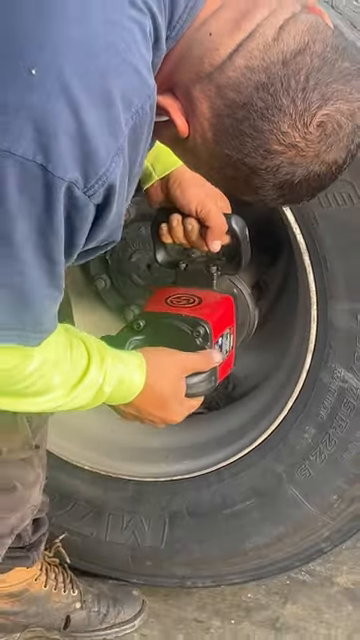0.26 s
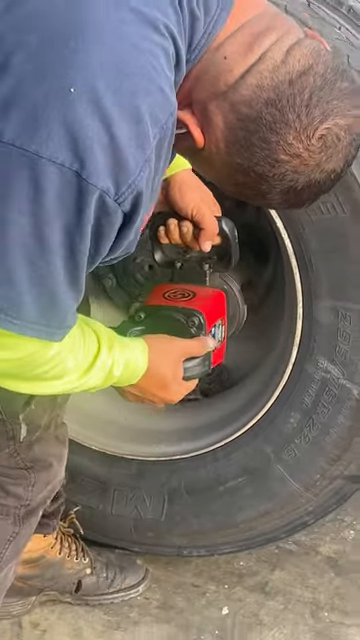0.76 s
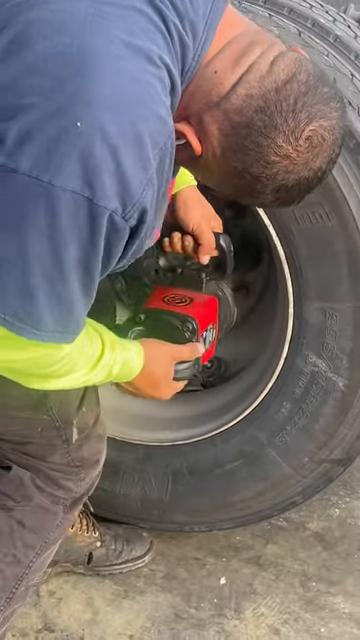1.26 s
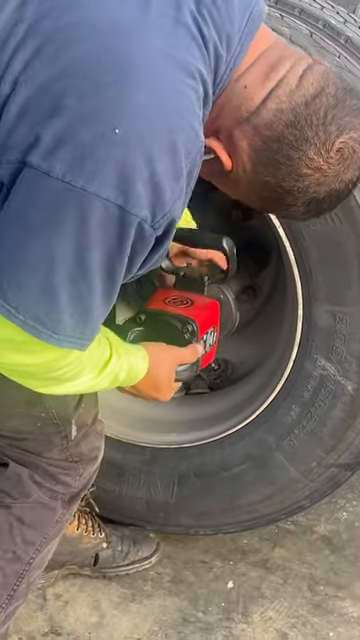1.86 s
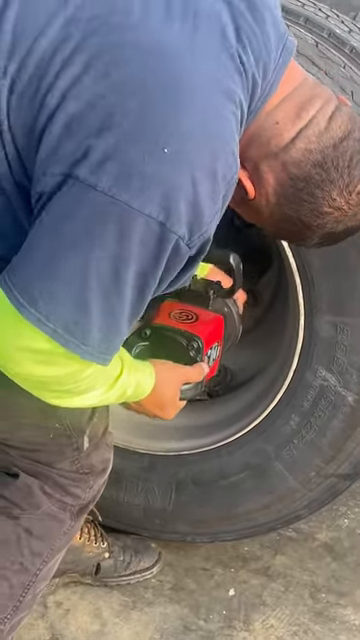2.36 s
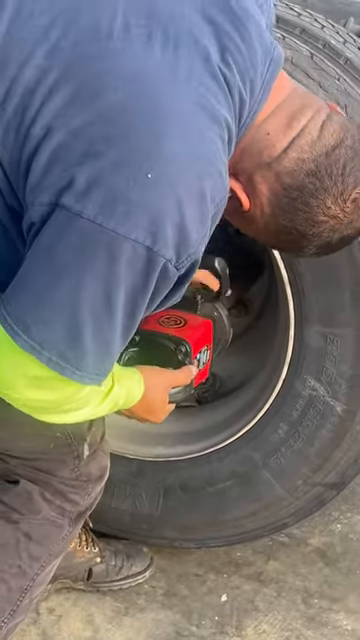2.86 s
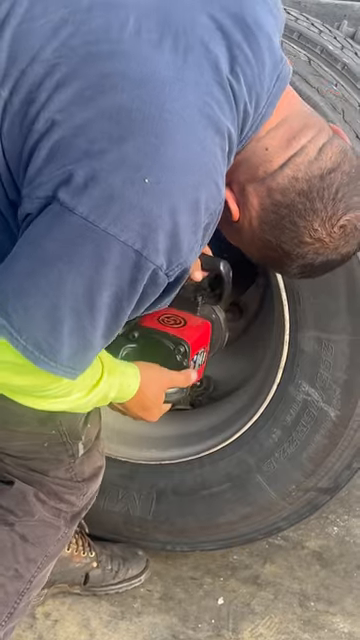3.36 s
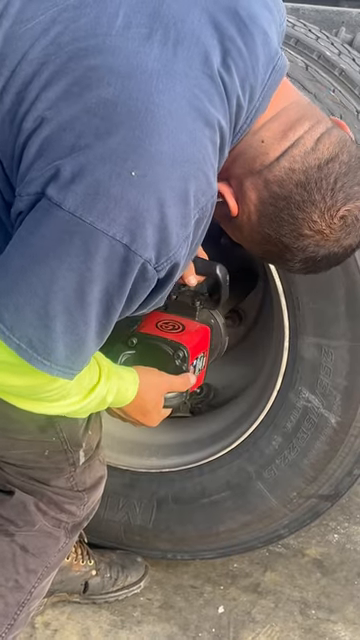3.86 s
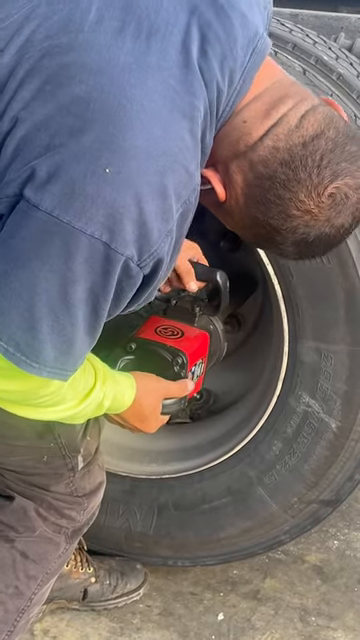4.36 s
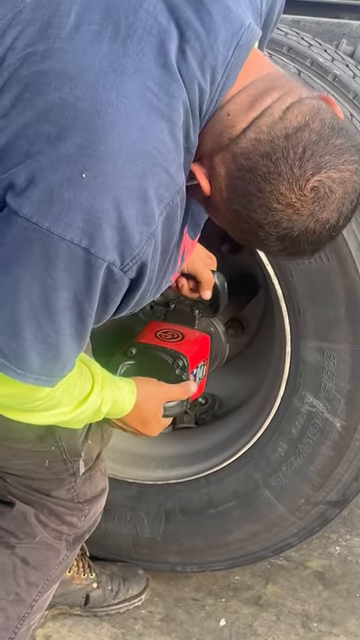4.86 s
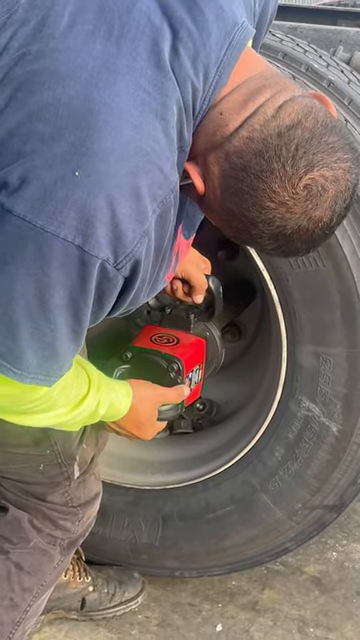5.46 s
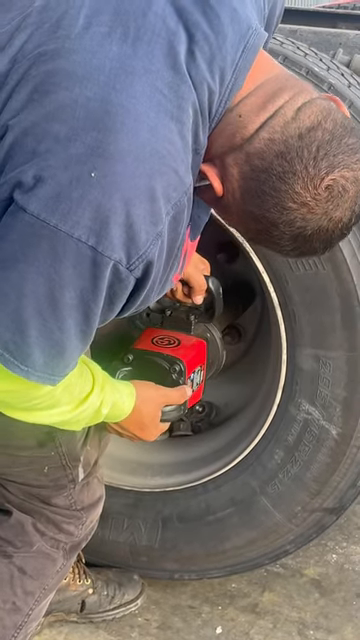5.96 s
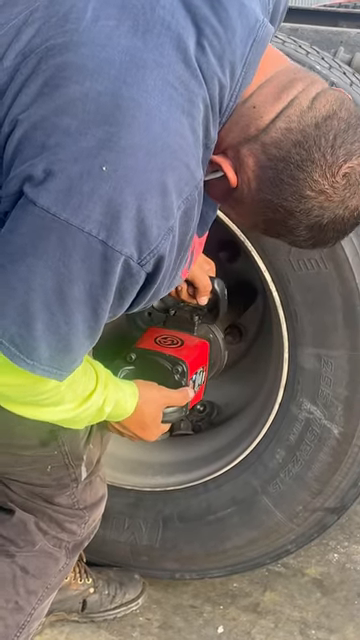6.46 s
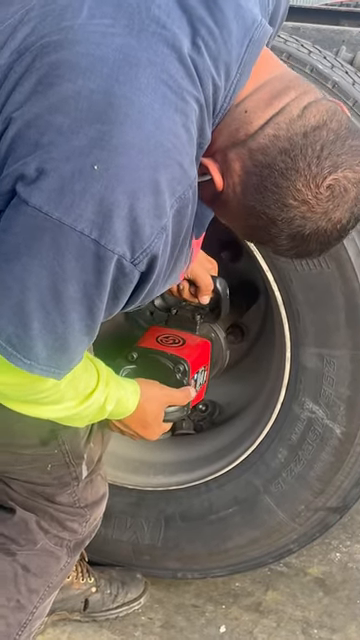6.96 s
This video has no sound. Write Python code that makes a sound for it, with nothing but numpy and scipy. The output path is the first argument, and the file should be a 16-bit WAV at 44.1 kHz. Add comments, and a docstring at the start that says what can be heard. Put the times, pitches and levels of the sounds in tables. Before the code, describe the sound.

A socket clinks onto a truck wheel nut before an air impact wrench pounds it with ringing metal blows and hissing exhaust.

```python
"""A noisy truck shop, a two-port microphone close to a pneumatic impact wrench on a wheel nut.
The socket is fitted with small clinks, then the tool hammers: each blow stalls the vane motor, the cam
slips free with a rattle, and the motor runs up again in quickening exhaust puffs until the next blow.
Farther off, machines rumble and hum and an air line hisses; the bay returns a little echo."""
import sys
import numpy as np
from scipy import signal
from scipy.fft import rfft, irfft, next_fast_len
from scipy.io import wavfile
from scipy.ndimage import map_coordinates

SR = 44100
rng = np.random.default_rng(int(sys.argv[2]) if len(sys.argv) > 2 else 0)


def transcribe(u):
    """Save the signal u as a 16-bit wav file named by the first command-line argument.

    u: samples, shape (n,) or (channels, n), limited to [-1, 1]; the rate is SR.
    q: integer samples, one column per channel.
    """
    v = np.clip(np.atleast_2d(u).T, -1, 1)
    q = np.round(v * 32767).astype(np.int16)
    wavfile.write(sys.argv[1], SR, q)


N = 317501
TIME = np.arange(N) / SR
T = np.arange(-SR // 10, SR // 10 + 1) / SR  # seconds around one short event

# The wrench close up, a row per hammer turn:
# (stalled rotor jerks free [s], rattle level [dB], blow on the anvil [s], blow level [dB])
HAMMER_TURNS = [(3.083, -28, 3.1158, -2.5), (3.1834, -15, 3.23, -2), (3.3173, -4.5, 3.3848, -2.5),
                (3.4748, -4, 3.5389, -2.5), (3.6167, -26, 3.6781, -2), (3.765, -3.5, 3.8286, -1),
                (3.9172, -4.5, 3.9807, -0.5), (4.0675, -4.5, 4.131, -2), (4.219, -4, 4.2812, -3),
                (4.371, -4, 4.4335, -2), (4.5217, -3.5, 4.586, -2.5), (4.6747, -4.5, 4.7394, -1),
                (4.826, -4, 4.8913, -3), (4.9793, -7.5, 5.0448, -3), (5.132, -6, 5.1964, -3),
                (5.284, -5, 5.3482, -5), (5.4363, -6.5, 5.5, -4), (5.5888, -6, 5.6549, -4),
                (5.7412, -6, 5.8042, -4.5), (5.8938, -5.5, 5.9544, -4.5), (6.0446, -8, 6.11, -5),
                (6.1989, -11.5, 6.2645, -5.5), (6.3533, -9.5, 6.4179, -4), (6.5079, -9, 6.576, -4),
                (6.6615, -8.5, 6.7287, -5), (6.8159, -10.5, 6.8862, -4), (6.9711, -8.5, 7.0414, -5),
                (7.1268, -11.5, 7.1964, -11)]
# Rattles out of step, as the tool starts and where the cam catches late: (time [s], level [dB])
ODD_RATTLES = [(3.034, -20), (3.0894, -25), (3.6228, -3)]
RATTLE_LEAD_S = 0.0077  # the cam rattles ahead of the jerk's pop


def hammer():
    """A blow lands hard on the anvil and chatters briefly; the cam rattle builds more slowly."""
    chatter = swell(0.0011, 0.0069) + 0.47 * np.roll(swell(0.0097, 0.0051), round(0.0063 * SR))
    blows = strikes([turn[2:] for turn in HAMMER_TURNS], chatter, lead_s=0,
                    taps=[(.3, 27.46), (5.43, 26.65)], chatter_db=0, crash_db=12, column=BLOW)
    slips = [(s - RATTLE_LEAD_S, db) for s, db, *_ in HAMMER_TURNS] + ODD_RATTLES
    rattles = strikes(slips, swell(0.0072, 0.0097), lead_s=0.0017,
                      taps=[(1, 22), (6, 19.5)], chatter_db=9.5, crash_db=11, column=RATTLE)
    return blows + rattles


def strikes(events, chatter, lead_s, taps, chatter_db, crash_db, column):
    """Repeatable taps (delay [ms], level [dB]) set the ring; fine random chatter roughens its treble."""
    s, db = np.transpose(events)
    grit = played(s - lead_s, db, chatter) * rng.standard_normal((2, N)) * amp(2 * wobble(500))
    impulse = 1. * (T == 0)
    knocks = sum(played(s + ms / 1000, db + tap_db + rng.normal(0, 0.98, len(s)), impulse)
                 for ms, tap_db in taps)
    force = knocks + amp(chatter_db) * filtered(grit[0], band(1150, 20000))
    return steel(force, amp(crash_db) * grit[1], column)


# Anvil, socket and wheel ringing near the microphone:
# (frequency [Hz], width [Hz], gain for a blow [dB], for a rattle [dB], for a clink [dB])
STEEL_MODES = [(604.5, 38, -1.5, -6, 3), (867, 104, -54, -6.5, -1), (1625, 44, -3, -14, 0.5),
               (1986, 15.6, 0, -5, -2), (2004, 106, 0.5, -1.5, 0), (2424, 64, -1.5, -4, -15),
               (2600, 88, -3, -11, -12), (2780, 53, 2, -4, -7), (2920, 19, 3.5, -5, -1.5),
               (3170, 47, -2.5, -12.5, -6), (3638, 55, -5, -12, -26), (4530, 60, -6, -13.5, -40),
               (4988, 193, -6.5, -16, -18), (5500, 49, -6.5, -12.5, -5.5), (5670, 83, -4.5, -13.5, -22),
               (7400, 670, -13, -17.5, -44), (9430, 65, -19, -37, -32), (11070, 80, -5.5, -19, -32)]
BLOW, RATTLE, CLINK = 2, 3, 4  # its gain columns
# Each mode's change as the nut seats: (rise [dB])
SEATING_RISE = [1.5, 4, 2, -4.5, -3.5, 2, -2, 1.5, 0.5, 0, -4.5, -3, 0.5, 3, -1.5, 0, 0, 4.5]
SEATING_S = (3.2, 6)
# Dense modes between the clear ones: (frequency [Hz], gain [dB])
CRASH_TONE = [(300, -28.5), (700, -23), (1400, -21.5), (3000, -20), (5600, -22), (8300, -30.5),
              (12000, -26), (14000, -36), (15600, -52)]


def steel(force, grit, column):
    """The force rings the modes, recoloured as the nut seats; grit feeds a broadband crash."""
    seated = np.interp(TIME, SEATING_S, [0, 1])
    db = np.transpose(STEEL_MODES)[column] + np.outer([-.5, .5], SEATING_RISE)  # loose, seated
    gains = amp(db) * (-1) ** np.arange(len(STEEL_MODES))
    modes = lambda f: gains @ np.array([peak(f, hz, width) for hz, width, *_ in STEEL_MODES])
    ring = filtered(force * [1 - seated, seated], modes).sum(axis=0)
    return ring + filtered(grit, lambda hz: amp(along(CRASH_TONE, hz)))


# Air through the motor: (time [s], leak level [dB], jerk puff level [dB], run-up puff level [dB])
MOTOR_AIR = [(3.02, -41, -14.5, -16.5), (3.09, -27.5, -14.5, -17.5), (3.19, -30.5, -20, -16),
             (3.32, -28, -11.5, -16.5), (3.63, -29, -13, -19), (3.93, -28.5, -11.5, -18),
             (4.69, -30.5, -12.5, -19.5), (5.6, -32, -16.5, -21.5), (6.35, -33.5, -16.5, -22),
             (7.2, -33.5, -14, -21.5)]
# Puffs round the jerk: (offset [ms], relative pop [dB], hiss [dB], whistle [dB])
JERK_PAIR = [(-14.5, -8.5, -5, -8.5), (0, -1, 4, 4)]
# Puffs of a run-up: (offset before stretching [ms], relative pop [dB], hiss [dB], whistle [dB])
RUNUP_STRING = [(0, 3, 7.5, 6), (12.46, -1.5, 3, 7), (21.77, -4.5, 0, 6), (29.92, -2.5, -0.5, 8),
                (37.08, -2.5, 4.5, 13.5), (43.9, -3, 0, 5), (55.2, -18, -19, -31)]
RUNUP_S, RUNUP_WAIT_S = .0368, .013  # longest lead on the blow, shortest wait after the jerk


def motor_puffs():
    """Each turn vents a pair, then a quickening string: rows of (s, dB, pop, hiss, whistle dB)."""
    jerk_s, _, blow_s, _ = np.transpose(HAMMER_TURNS)
    runup_s = np.maximum(blow_s - RUNUP_S, jerk_s + RUNUP_WAIT_S)
    stretch = 1.02 * ((blow_s - runup_s) / RUNUP_S) ** .48  # a short run-up crowds its puffs
    at, _, jerk_db, runup_db = np.transpose(MOTOR_AIR)
    jerks = [(s + ms / 1000, np.interp(s, at, jerk_db), *levels)
             for s in jerk_s for ms, *levels in JERK_PAIR]
    runups = [(s + k * ms / 1000, np.interp(s, at, runup_db), *levels)
              for s, k in zip(runup_s, stretch) for ms, *levels in RUNUP_STRING]
    return jerks + runups


# The exhaust jet at close range: (frequency [Hz], spectral level [dB])
JET_TONE = [(700, 6.5), (1300, -1.5), (2000, -3.5), (3000, -4.5), (4200, -2), (5600, -3), (8300, -8.5),
            (10000, -3), (12500, 1.5), (14300, -3), (15600, -29)]


def exhaust():
    """Each vane chamber vents: hiss and a short whistle first, then a low pop out of the muffler."""
    s, db, *levels = np.transpose(motor_puffs())
    scatter_db = [[.8], [1.2], [.8]] * rng.standard_normal((len(s), 3)).T
    pop_db, hiss_db, whistle_db = db + levels + scatter_db
    pop = np.exp(-.5 * ((T - .0008) / 0.0028) ** 2) * np.cos(2 * np.pi * 170 * T)
    pop += 0.66 * np.exp(-.5 * ((T - .008) / 0.0033) ** 2) * np.cos(2 * np.pi * 72 * (T - .012))
    whistle = np.cos(2 * np.pi * 930 * T) + 0.23 * np.cos(2 * np.pi * 500 * T)
    whistle *= np.exp(-.5 * (T / 0.0015) ** 2)
    vent_s = s - .0085
    jet = played(vent_s - .003, hiss_db - 7, swell(0.004, 0.0051))
    hiss = filtered(jet * noise(JET_TONE), band(890, 16400))
    return played(s, pop_db, pop) + played(vent_s, whistle_db - 11.5, whistle) + hiss


# The leak at close range: (frequency [Hz], spectral level [dB])
LEAK_TONE = [(400, 4), (700, -12), (1300, -5.5), (2000, -2), (3000, 1.5), (4200, -4), (5600, -3.5),
             (7000, -6), (8300, -14.5), (10000, -10.5), (12000, -10), (13800, -11.5), (15300, -30)]


def vane_leak():
    """Air hisses past the vanes for as long as the tool runs."""
    leak_db = curves(MOTOR_AIR)[0] + 2.4 * wobble(40)
    return amp(leak_db) * (TIME > 3.03) * noise(LEAK_TONE)


# Socket and tool touch nut and rim, near the microphone:
# (time [s], level [dB], relative thud [dB], contact decay [ms], low edge [Hz], high edge [Hz])
TOUCHES = [(0.222, -29.5, -7, 8, 390, 9600), (0.799, -42, -25, 4, 1300, 6500),
           (0.8592, -37.5, -18, 5.9, 1290, 7000), (0.927, -44, -17, 3, 1700, 2600),
           (1.012, -33.5, -11, 4.4, 390, 9000), (1.1937, -40.5, -13, 5.2, 500, 5500),
           (1.284, -44, -17, 2, 3000, 6500), (1.354, -46, -22, 4.6, 1500, 6000),
           (1.6375, -33.5, -18, 3.2, 1500, 2780), (2.156, -49.5, -20, 18, 1200, 5000),
           (2.4164, -49, -20, 3, 1500, 5000), (2.43, -44, -22, 4.5, 1500, 6500),
           (2.565, -47, -20, 4, 1500, 3000), (2.62, -34, -10, 17, 1550, 5540),
           (2.672, -27.5, 0, 11, 300, 11700)]


def socket_clinks():
    """Light touches ring the same steel, each over its own band; the heavier ones thud in the tyre."""
    grit = rng.standard_normal(N)
    force = sum(filtered(grit * played([s], [db + 12], swell(0.0013, ms / 1000)), band(low, high))
                for s, db, _, ms, low, high in TOUCHES)
    s, db, thud_db, *_ = np.transpose(TOUCHES)
    thud = swell(0.011, 0.012) * (np.sin(2 * np.pi * 105 * T) + 1.02 * np.sin(2 * np.pi * 190 * T))
    thud += 1.02 * swell(0.0011, 0.0057) * np.sin(2 * np.pi * 420 * T)
    return steel(force, amp(7.5) * force, CLINK) + played(s, db + thud_db, thud)


# Faint rings among the clinks: (time [s], frequency [Hz], level [dB], time to fall 60 dB [s])
THIN_RINGS = [(0, 1233, -45, .25), (0, 1231, -51, 1.4), (0, 11127, -56, .7), (.9, 2700, -62, .6),
              (1.16, 2700, -65, .5), (2.03, 2700, -62, .15)]


def thin_rings():
    """Lone thin tones flicker as they die away."""
    rings = np.zeros(N)
    for s, hz, db, t60 in THIN_RINGS:
        level_db = db - 60 * np.abs(TIME - s) / t60 + 1.6 * wobble(29)
        rings += (TIME > s) * amp(level_db) * np.sin(2 * np.pi * hz * TIME)
    return rings


# The shop floor, well back from the microphone: (time [s], rumble level [dB], hiss level [dB])
SHOP_LEVELS = [(0.0, -50, -55.5), (0.12, -49, -60.5), (0.32, -49, -58), (0.53, -47.5, -60),
               (0.87, -47, -57.5), (1.02, -44, -56), (1.18, -44, -55), (1.49, -43.5, -56),
               (2.65, -42.5, -54.5), (2.79, -40.5, -52.5), (3.0, -40, -53)]
# Its room tone: (frequency [Hz], spectral level [dB])
ROOM_TONE = [(30, 2.5), (65, 6.5), (130, -3), (240, -2), (400, -12), (800, -21), (1600, -25), (3000, -34.5),
             (5000, -40.5), (7000, -33.5), (9000, -39), (12000, -28), (14000, -33), (15500, -35)]
# Distant machines: (frequency [Hz], pitch waver [Hz], level waver [dB], relative level [dB])
MACHINE_HUM = [(66.1, 6.05, 5.5, -55), (235.8, 4, 1.8, -50.5)]


def shop():
    """Distant machines rumble and hum; an air line hisses."""
    rumble_db, hiss_db = curves(SHOP_LEVELS)
    bed = noise(ROOM_TONE)
    low = filtered(bed, lambda hz: 1 / (1 + (hz / 700) ** 4))
    hum = np.zeros(N)
    for hz, waver_hz, waver_db, db in MACHINE_HUM:
        gain = amp(db + 1 + waver_db * wobble(25))
        hum += gain * np.sin(2 * np.pi * np.cumsum(hz + waver_hz * wobble(20)) / SR)
    rumble = amp(rumble_db + 1.6 * wobble(6)) * unit(low)
    hiss = amp(hiss_db + 1.1 * wobble(1.7)) * unit(bed - low)
    return rumble + hiss + hum


# The work bay around the microphone: (frequency [Hz], time to fall 60 dB [s])
BAY_DECAY = [(200, 0.17), (2000, 0.4), (10000, 0.12)]


def bay_echo(x):
    """The bay returns a short diffuse tail, different at each port."""
    hz, t, spectrum = signal.stft(rng.standard_normal((2, SR // 2)), SR, nperseg=256)
    decay = amp(-60 * t / along(BAY_DECAY, hz)[:, None])
    tail = signal.istft(spectrum * decay, SR, nperseg=256)[1]
    sent = filtered(x, band(230, 20000))
    return signal.fftconvolve(sent[None], tail / np.linalg.norm(tail[0]), axes=1)[:, :N]


# Phase across the microphone: (frequency [Hz], left port's lead [rad])
PORT_LEAD = [(0, 0), (600, -.3), (1300, -1.2), (2500, .4), (4200, 0), (6000, -.6), (8300, -np.pi),
             (12100, -2 * np.pi), (15300, -3 * np.pi)]
# Its balance: (frequency [Hz], left minus right [dB])
PORT_TILT = [(90, 0), (150, -1), (250, -2), (700, -1), (1300, -4.5), (2400, -1), (4400, 0)]
# Sound common to both ports: (frequency [Hz], share of power [0-1])
PORT_SHARE = [(90, 1), (150, .995), (300, .86), (600, .97), (950, .94), (1400, .68), (2500, .96),
              (4200, .995), (6000, .85), (8300, .98), (10000, .8), (12100, .97), (14000, .85), (15300, .99)]


def microphone(x):
    """Both ports hear one sound with a phase lead and tilt, plus a part scattered differently to each."""
    def direct(hz):
        left = amp(along(PORT_TILT, hz) / 2) * np.exp(.5j * np.interp(hz, *np.transpose(PORT_LEAD)))
        return np.sqrt(along(PORT_SHARE, hz)) * np.array([left, 1 / left])
    unshared = filtered(x, lambda hz: np.sqrt(1 - along(PORT_SHARE, hz)))
    spectrum = signal.stft(unshared, nperseg=256)[2]
    phases = np.exp(2j * np.pi * rng.random((2, *spectrum.shape)))
    scattered = signal.istft(spectrum * phases, nperseg=256)[1][:, :N]
    return filtered(x, direct) + np.sqrt(2) * scattered


def amp(db):
    """dB to gain."""
    return 10 ** (np.asarray(db) / 20)


def unit(x):
    """Scaled to rms 1."""
    return x / np.sqrt(np.mean(x ** 2) + 1e-20)


def along(points, hz):
    """(Hz, value) points interpolated on a log axis."""
    f, v = np.transpose(points)
    return np.interp(np.log(hz + 1), np.log(f + 1), v)


def curves(rows):
    """One value per sample for each column after the time."""
    s, *cols = np.transpose(rows)
    return [np.interp(TIME, s, c) for c in cols]


def wobble(rate):
    """A smooth random curve, rate knots a second."""
    return map_coordinates(rng.standard_normal(int(N * rate / SR) + 4), [TIME * rate])


def filtered(x, response):
    """x through a complex frequency response."""
    m = next_fast_len(N + SR // 2)
    return irfft(rfft(x, m) * response(np.fft.rfftfreq(m, 1 / SR)), m)[..., :N]


def noise(tone):
    """Noise of rms 1 with a (Hz, dB) spectrum."""
    return unit(filtered(rng.standard_normal(N), lambda hz: amp(along(tone, hz))))


def peak(f, hz, width):
    """One resonance, gain 1 at its centre."""
    return 1j * f * width / (hz * hz - f * f + 1j * f * width)


def band(low_hz, high_hz):
    """A soft-edged band response."""
    return lambda hz: hz ** 4 / (hz ** 4 + low_hz ** 4) / (1 + (hz / high_hz) ** 6)


def played(times, db, shape):
    """A copy of shape centred on each time."""
    at = np.round(np.asarray(times) * SR).astype(int)
    return signal.fftconvolve(np.bincount(at, amp(db), N + SR), shape, "same")[:N]


def swell(rise_s, fall_s):
    """An envelope that is silent until 0 s, rises and dies away."""
    t = np.maximum(T, 0)
    shape = (1 - np.exp(-t / rise_s)) * np.exp(-t / fall_s)
    return shape / shape.max()


def scene():
    """The tool close to the microphone, the shop behind, a little echo from the bay."""
    tool = hammer() + exhaust() + vane_leak()
    touches = socket_clinks() + thin_rings()
    echo = bay_echo(amp(-43.5) * tool + amp(-14.5) * touches)  # the echo after the clinks stands out far more than after the tool
    return microphone(tool + touches + shop()) + echo


def record(dry):
    """The input rounds off the highest peaks, rolls off deep bass and cuts all above its band limit."""
    ceiling, bass_hz, top_hz = .95, 46.7, 15770
    soft = dry / (1 + np.abs(dry / ceiling) ** 4) ** .25
    return filtered(soft, lambda hz: (hz < top_hz) * hz ** 4 / (hz ** 4 + bass_hz ** 4))


dry = scene()
out = record(dry)
transcribe(out)
```